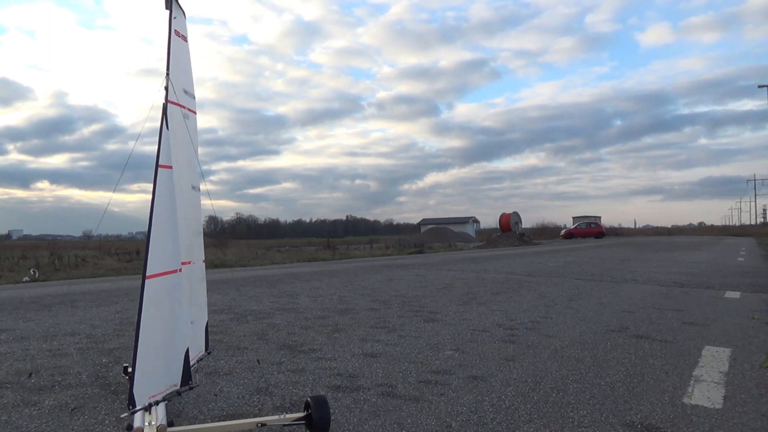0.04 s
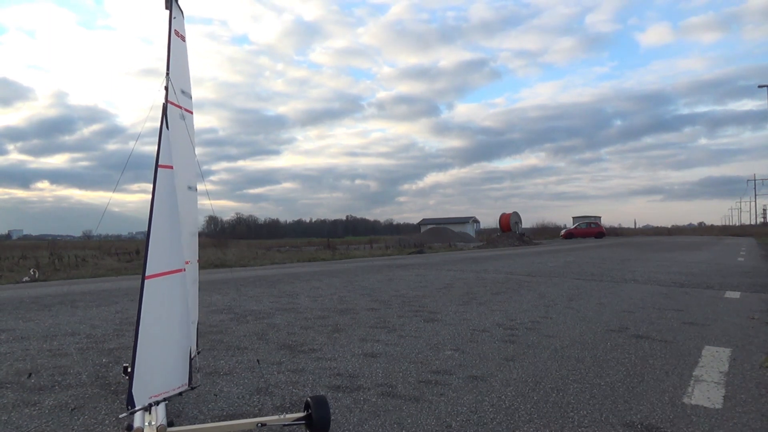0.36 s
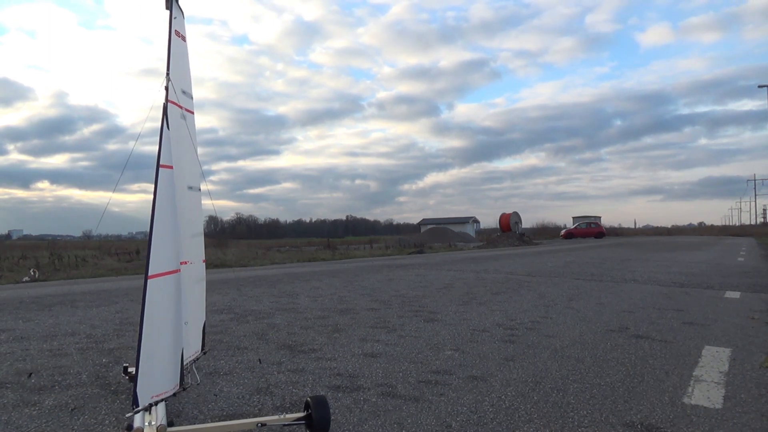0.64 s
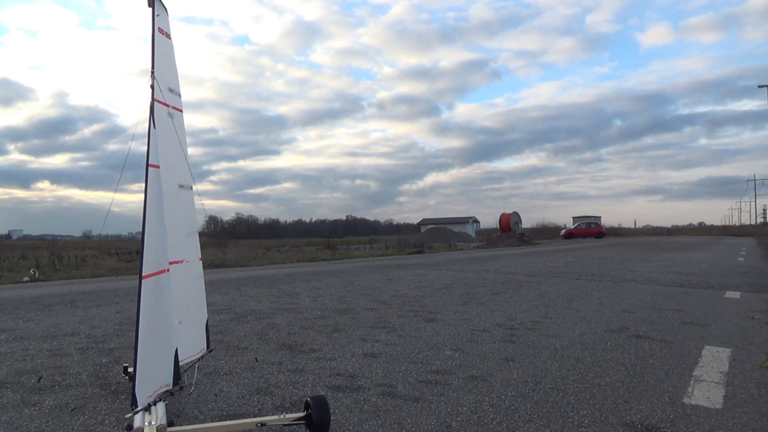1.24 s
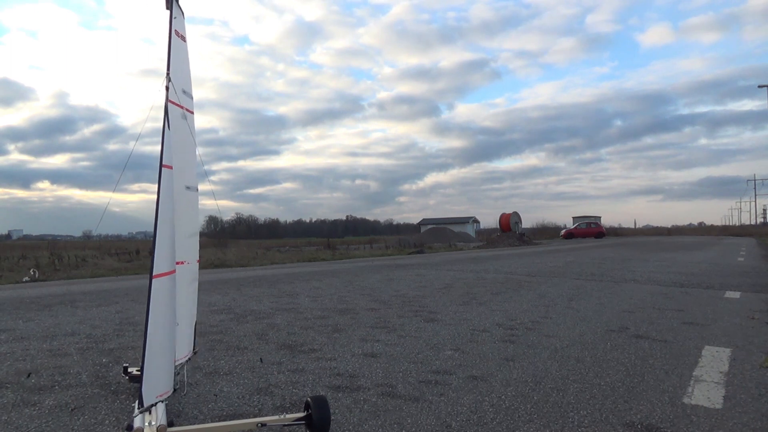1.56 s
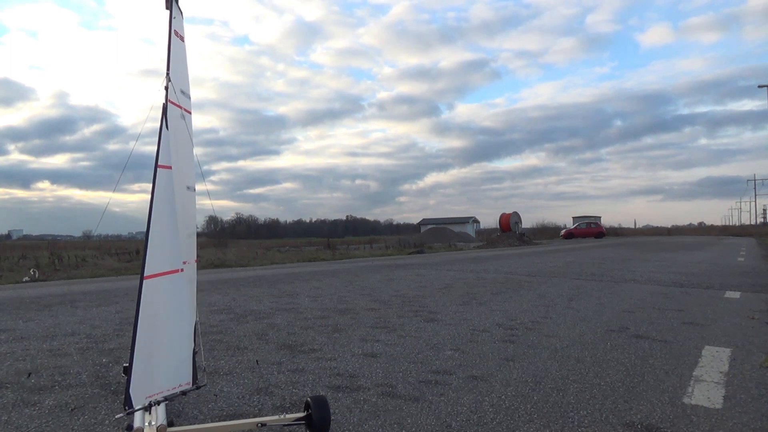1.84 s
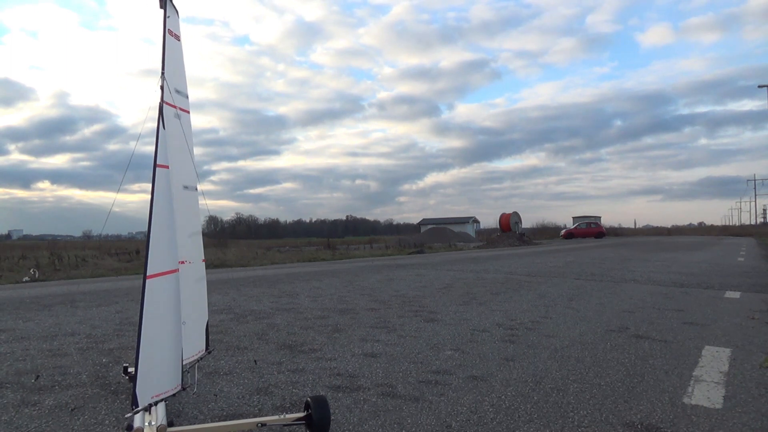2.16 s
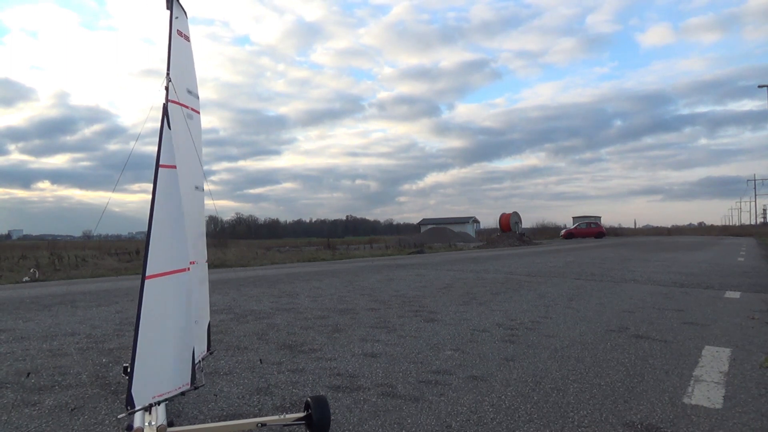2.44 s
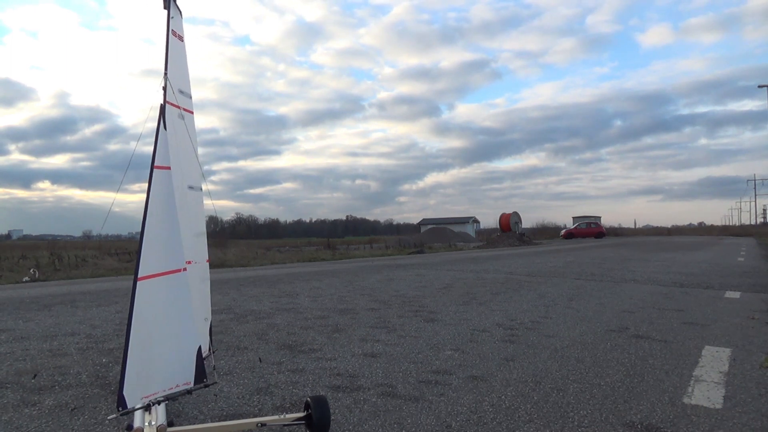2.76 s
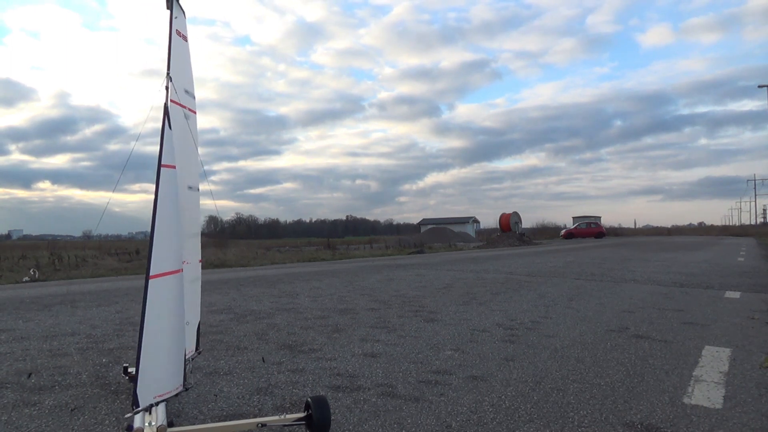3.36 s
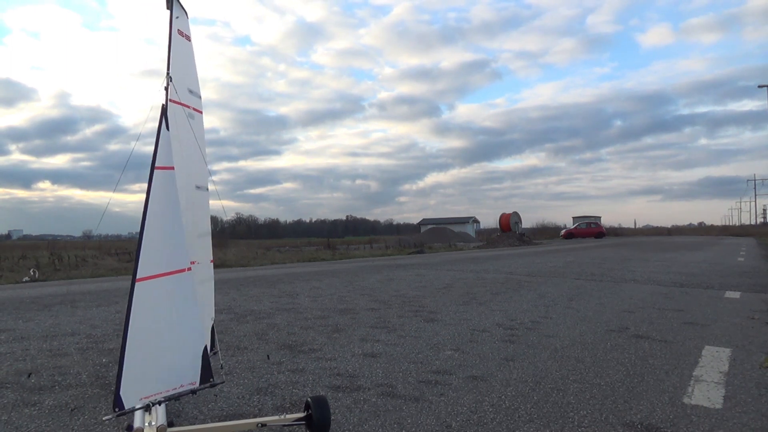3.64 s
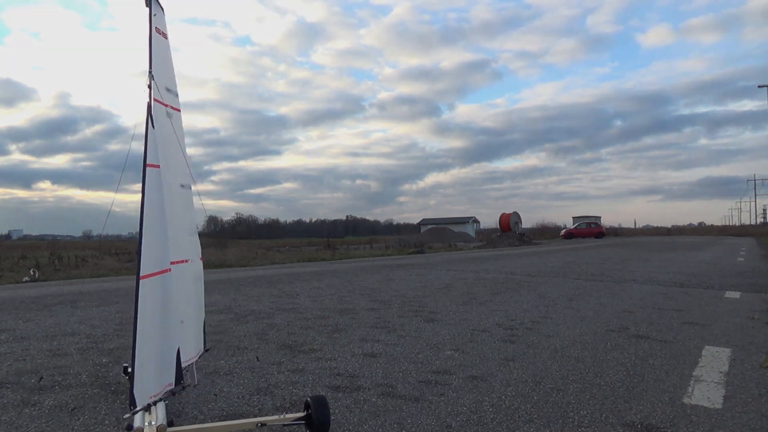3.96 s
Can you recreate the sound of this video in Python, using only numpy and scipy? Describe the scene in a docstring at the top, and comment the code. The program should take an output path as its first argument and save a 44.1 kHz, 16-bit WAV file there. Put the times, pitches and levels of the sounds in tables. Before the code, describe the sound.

A sail rustles, snaps and flaps in rumbling wind, with distant traffic fading.

```python
"""Land yacht in the wind

A small land yacht stands on open tarmac, its sail swinging from side to side. With each swing
many tiny wrinkles tick and merge into a rustle; creases snap, the belly flaps and a rigging
fitting clacks once. Wind rumbles on the microphone, and a howling roar, probably tyres on a
far road, slowly recedes."""
import sys
import numpy as np
from scipy import signal
from scipy.fft import rfft, irfft
from scipy.io import wavfile
from scipy.ndimage import uniform_filter1d

SR = 44100
rng = np.random.default_rng(int(sys.argv[2]) if len(sys.argv) > 2 else 0)


def wav_out(sig):
    """Save sig, one row per channel (or a flat mono array), as 16-bit PCM at SR to the path in sys.argv[1]."""
    wavfile.write(sys.argv[1], SR, np.round(np.clip(np.atleast_2d(sig).T, -1, 1) * 32767).astype(np.int16))


N = 176400
TIME = np.arange(N) / SR

# Course of the distant roar: t/s, level/dB, left minus right/dB
ROAR_COURSE = [(0, -24.5, 3), (.24, -22.5, 2), (.58, -24, 3.5), (.72, -23.5, 1.5), (1.18, -22.5, 0),
               (1.35, -25, -2), (1.62, -25.5, -4), (1.85, -28.5, -2.5), (2.5, -28.5, -1), (3.05, -28, -1.5),
               (3.5, -29.5, 2.5), (4, -30, 4)]
# Rustle of the cloth, swelling with each swing: t/s, level/dB
RUSTLE_LEVEL = [(0, -42), (.09, -46), (.2, -45), (.32, -40.5), (.62, -45), (.74, -39.5), (.89, -68),
                (1.02, -37.5), (1.17, -50), (1.26, -40), (1.29, -32), (1.35, -30.5), (1.42, -39.5),
                (1.52, -45), (1.61, -33), (1.7, -41.5), (1.79, -63), (1.91, -49), (1.975, -30.5),
                (2.04, -29), (2.13, -33), (2.22, -37.5), (2.31, -36.5), (2.43, -54), (2.54, -51),
                (2.64, -34.5), (2.75, -42.5), (2.8, -32), (2.85, -40.5), (2.91, -38.5), (2.96, -50.5),
                (3.14, -50.5), (3.22, -33), (3.31, -43), (3.38, -38.5), (3.45, -64), (3.6, -40.5),
                (3.66, -51.5), (3.92, -39.5), (4, -47)]


def amp(db):
    """Amplitude ratio for a level in decibels."""
    return 10 ** (np.asarray(db) / 20)


def unit(x):
    """Normalisation to an rms of 1."""
    return x / np.sqrt(np.mean(x ** 2) + 1e-20)


def colour(points, hz):
    """Interpolation of a spectrum on a logarithmic frequency axis."""
    f, value = np.transpose(points)
    return np.interp(np.log(hz + 1), np.log(f), value)


def curve(rows, t):
    """Linear interpolation of each column of a table at times t."""
    times, *columns = np.transpose(rows)
    return [np.interp(t, times, column) for column in columns]


def pan(db):
    """Level-difference stereo: two gains for a level of left minus right."""
    gains = amp(np.array([np.atleast_1d(db), -np.atleast_1d(db)]) / 2)
    return gains / gains.mean(0)


def add(mix, onset, sound):
    """Superposition of a stereo sound on the mix, from an onset in seconds."""
    part = mix[:, round(onset * SR):][:, :sound.shape[1]]
    part += sound[:, :part.shape[1]]


def shaped(pair, spectrum, coherence):
    """Partial coherence: two independent signals are filtered and mixed as mid and side."""
    hz = np.fft.rfftfreq(N, 1 / SR)
    a, b = rfft(pair)
    alike = np.clip(colour(coherence, hz), 0, 1)
    mid, side = a * np.sqrt(1 + alike), b * np.sqrt(1 - alike)
    return unit(irfft(np.array([mid + side, mid - side]) * amp(colour(spectrum, hz)), N))


def noise(spectrum):
    """Coloured open-air noise, less coherent between the channels in the treble."""
    # Likeness of left and right: f/Hz, coherence (0-1)
    air_coherence = [(40, 0.9), (300, 0.98), (1000, 0.95), (2500, 0.99), (5000, 0.7), (11000, 0.74)]
    return shaped(rng.standard_normal((2, N)), spectrum, air_coherence)


def waver(rate_hz, depth_db):
    """Random amplitude modulation: a log-normal gain fluctuating at around the given rate."""
    hz = np.fft.rfftfreq(N, 1 / SR)
    band = (hz / rate_hz) * np.exp(-(hz / rate_hz) ** 2)
    drift = unit(irfft(rfft(rng.standard_normal(N)) * band, N))
    return unit(amp(depth_db * drift))


def roar():
    """Attenuation with distance: the receding roar grows fainter and lower, wavering in the wind."""
    # Spectra of the roar when near and when far: f/Hz, relative density/dB
    near_spectrum = [(100, -18), (350, -22.5), (600, -8.5), (800, -2), (950, 0.5), (1250, -1.5),
                     (1700, -6.5), (2300, -19), (3300, -29.5), (5000, -40.5), (11000, -46)]
    far_spectrum = [(100, -14.5), (350, -10.5), (600, -3), (780, 0), (920, 2), (1250, -3.5), (1700, -14),
                    (2300, -19.5), (3300, -24.5), (5000, -35), (11000, -41.5)]
    db, side_db = curve(ROAR_COURSE, TIME)
    nearness = np.clip((db - db.min()) / np.ptp(db), 0, 1) ** 0.95
    sound = np.sqrt(nearness) * noise(near_spectrum) + np.sqrt(1 - nearness) * noise(far_spectrum)
    return sound * amp(db) * pan(side_db) * waver(rate_hz=20, depth_db=1.06)


def howl():
    """Narrow-band noise has a pitch: a howl stands out of the near roar, higher when stronger."""
    # Strength of the howl: t/s, level/dB
    howl_level = [(0, -36), (.28, -26), (.42, -28.5), (.57, -22.5), (.7, -34.5), (.95, -33.5),
                  (1.16, -26.5), (1.35, -36), (4, -45.5)]
    top_hz, hz_per_db, width_hz = 949, 3.5, 157
    db = curve(howl_level, TIME)[0]
    hz = top_hz + hz_per_db * (db - db.max())
    lowpass = signal.butter(2, width_hz / 2, fs=SR, output="sos")
    baseband = signal.sosfilt(lowpass, rng.standard_normal(N) + 1j * rng.standard_normal(N))
    carrier = np.exp(2j * np.pi * np.cumsum(hz) / SR)
    return unit((baseband * carrier).real) * amp(db) * pan(curve(ROAR_COURSE, TIME)[1])


def wind():
    """Turbulent pressure at the microphone: an uneven rumble with a few stronger eddies."""
    # Strength of the rumble: t/s, level/dB
    wind_level = [(0, -33.5), (1, -32.5), (1.8, -34.5), (2.75, -33.5), (3.05, -32.5), (3.45, -31),
                  (3.85, -33), (4, -36)]
    # Spectrum of the rumble: f/Hz, relative density/dB
    wind_spectrum = [(20, -34), (45, -11.5), (65, -1), (90, -1), (130, 0.5), (200, -3.5), (300, -15.5),
                     (600, -25.5), (2000, -38)]
    # Eddies, each at its peak: t/s, level/dB, f/Hz, half length/s
    eddies = [(2.968, -15.5, 106.3, 0.014), (3.285, -20.5, 104, 0.0169), (3.419, -25.5, 82.3, 0.03)]
    sag_per_s = 8.4
    out = noise(wind_spectrum) * amp(curve(wind_level, TIME)[0]) * waver(rate_hz=21.7, depth_db=1.83)
    for peak_time, db, hz, half_length in eddies:
        t = np.arange(-3 * half_length, 3 * half_length, 1 / SR)
        cycles = np.cumsum(hz * np.exp(-sag_per_s * t)) / SR
        buffet = np.exp(-(t / half_length) ** 2) * np.sin(2 * np.pi * cycles)
        add(out, peak_time + t[0], amp(db) * buffet * pan(db=3.5))
    return out


def rigging():
    """Impact excitation: a fitting jerked tight ticks on contact, then rings in damped modes."""
    # The clack and its rebound: t/s, level/dB
    impacts = [(3.6939, -3.5), (3.6953, -9)]
    # Modes of the fitting: f/Hz, relative level/dB, T60/s
    modes = [(2190, 0, 0.008), (2390, -1.5, 0.014), (3260, -7.5, 0.026), (3840, -6.5, 0.012)]
    tick_db, tick_decay_s, rise_s = -19, .0007, .0008
    out, t = np.zeros((2, N)), np.arange(SR // 20) / SR
    ring = sum(amp(db - 60 * t / t60) * np.sin(2 * np.pi * hz * t) for hz, db, t60 in modes)
    ring *= 1 - np.exp(-(t / rise_s) ** 2)
    for onset, db in impacts:
        tick = amp(tick_db) * rng.standard_normal(len(t)) * np.exp(-t / tick_decay_s)
        add(out, onset, amp(db) * (tick + ring) * pan(db=0.74))
    return out


def flaps():
    """Heavily damped oscillation: the sail fills with a short thump that sags in pitch."""
    # Thumps of the sail's belly: t/s, envelope peak/dB, starting f/Hz, decay time/s
    thumps = [(1.361, -22, 332, 0.0068), (1.376, -16.5, 307, 0.0026), (1.972, -13.5, 630, 0.0012),
              (2.0385, -12, 660, 0.0028), (2.6255, -4, 500, 0.00079), (3.09, -18.5, 337, 0.0038),
              (3.588, -23, 310, 0.0074)]
    rise_s, sag_fraction = .0011, 0.15
    out, t = np.zeros((2, N)), np.arange(SR // 10) / SR
    for onset, db, hz, decay_s in thumps:
        decay = np.exp(-t / decay_s)
        envelope = (1 - np.exp(-(t / rise_s) ** 2)) * decay
        cycles = np.cumsum(hz * (1 - sag_fraction * (1 - decay))) / SR
        thump = -envelope / envelope.max() * np.sin(2 * np.pi * cycles)
        add(out, onset, amp(db) * thump * pan(db=-2.5))
    return out


def snaps(size=1024):
    """Snap-through buckling: a crease pops over in one sharp pulse, and the cloth shivers briefly."""
    # Snapping creases: t/s, level/dB (energy spread over 1 ms), centre f/Hz, width/octaves
    creases = [(.172, -21.5, 2860, 0.35), (0.244, -22, 2130, 0.3), (0.3683, -25.5, 3260, 0.83),
               (0.982, -24, 2500, 0.68), (1.065, -22, 3650, 0.64), (1.2725, -18, 9500, 2.9),
               (1.2924, -27, 9500, 1.3), (1.34, -22, 2780, 2.6), (1.3781, -16.5, 1010, 1.3),
               (1.563, -30, 5000, 1), (1.6073, -21.5, 1800, 1.4), (1.631, -36, 2600, 1.3),
               (1.6627, -29.5, 2180, 1.1), (1.6977, -18.5, 1580, 1.06), (1.7513, -27.5, 1700, 1.8),
               (2.0304, -18, 1190, 0.72), (2.0369, -15.5, 2400, 1.43), (2.0473, -19.5, 1880, 2.4),
               (2.0933, -17.5, 2600, 3.9), (2.103, -19, 2500, 0.22), (2.123, -22, 5000, 6.2),
               (2.239, -19, 2000, 0.73), (2.2974, -26, 4700, 0.9), (2.306, -22.5, 2020, 0.87),
               (2.6121, -14.5, 780, 0.22), (2.6224, -17, 1090, 1.9), (2.685, -13.5, 1260, 0.64),
               (2.6898, -13.5, 1250, 0.72), (2.73, -26.5, 3620, 0.55), (2.799, -19.5, 890, 1.5),
               (2.8081, -23, 3320, 0.66), (2.8158, -21.5, 2660, 0.27), (2.925, -20.5, 5500, 1.4),
               (3.014, -25, 2600, 1.14), (3.159, -24, 1800, 0.56), (3.2033, -24.5, 2800, 0.26),
               (3.8178, -29.5, 5500, 2.5), (3.8305, -31, 4500, 1.4), (3.919, -26, 3500, 0.56)]
    shiver_gain, shiver_decay_s = 1.23, .0024
    out, t = np.zeros((2, N)), np.arange(size) / SR
    hz = abs(np.fft.fftfreq(size, 1 / SR)) + 1
    for onset, db, centre_hz, octaves in creases:
        log_gain = -5.1 * np.log(1 + (np.log2(hz / centre_hz) / octaves) ** 2 / 4)
        pulse = np.fft.ifft(np.exp(np.conj(signal.hilbert(log_gain)))).real  # minimum phase
        mid, side = rng.standard_normal((2, size)) * np.exp(-t / shiver_decay_s)
        shiver = np.array([mid + side / 2, mid - side / 2])
        tail = signal.fftconvolve(shiver / np.linalg.norm(shiver[0]), pulse[None])[:, :size]
        pop = unit(pulse + shiver_gain * tail) * np.sqrt(.001 * SR / size)
        add(out, onset, amp(db) * pop)
    return out


def crinkles(bands=24):
    """A Poisson process: wrinkles tick in broad resonances, sparse in lulls, crowded in a swing."""
    peak_ticks_per_s, crowding, spread_db = 4700, 1.15, 2.5
    out, db = np.zeros((2, N)), curve(RUSTLE_LEVEL, TIME)[0]
    activity = amp(db - db.max()) ** crowding
    for hz in np.geomspace(700, 10500, bands):
        strength = amp(spread_db * np.minimum(rng.exponential(1, N), 3))
        strength /= np.sqrt(activity)  # mean power stays the same at any tick rate
        angle = 2 * np.pi * rng.random(N)  # shares each tick between mid and side
        fires = rng.random(N) < activity * peak_ticks_per_s / bands / SR
        ticks = strength * fires * np.array([np.cos(angle), np.sin(angle)])
        resonance = signal.iirpeak(hz, Q=1.02, fs=SR)
        out += signal.lfilter(*resonance, signal.lfilter(*resonance, ticks))
    return unit(out)


def rustle():
    """Modulated noise: crinkles and swish follow the swing, flickering in colour as the cloth ripples."""
    # Spectrum of the cloth before the tilt: f/Hz, relative density/dB
    cloth_spectrum = [(100, -15), (300, 18.5), (700, 7.5), (1500, 9), (2800, 5), (4500, 1), (7500, -5),
                      (10700, -4)]
    # Likeness of left and right: f/Hz, coherence (0-1)
    cloth_coherence = [(300, 0.33), (2500, 1), (5500, 0.57), (11000, 0.56)]
    # Brightness of the rustle: t/s, tilt above 1500 Hz/(dB per octave)
    brightness = [(0, 7), (.3, -3), (1.05, 0), (1.31, 5), (1.62, -1.5), (1.97, 1.5), (2.7, 1.5), (3.3, 1.5),
                  (3.92, -2.5)]
    crinkle_db, swish_db, flicker_db = -1.2, -6.5, 3
    drive = amp(crinkle_db) * crinkles() + amp(swish_db) * rng.standard_normal((2, N))
    cloth = shaped(drive, cloth_spectrum, cloth_coherence) * waver(rate_hz=44, depth_db=1.5)
    hz, t, spectra = signal.stft(cloth, SR, nperseg=256)
    patches = uniform_filter1d(rng.standard_normal((len(t), len(hz))), size=7, axis=0)  # along time
    patches = uniform_filter1d(patches, size=5, axis=1)  # along frequency
    flicker = unit(amp(flicker_db * unit(patches))).T
    octaves = np.log2(np.maximum(hz, 1500) / 4000)
    tilt = amp(curve(brightness, t)[0] * octaves[:, None])
    rippling = signal.istft(spectra * flicker * tilt, SR, nperseg=256)[1][:, :N]
    return rippling * amp(curve(RUSTLE_LEVEL, TIME)[0]) * pan(db=-1.5)


def scene():
    """Free-field superposition: the sources add in the open air, with no echo."""
    return roar() + howl() + wind() + rustle() + snaps() + flaps() + rigging()


def record(dry):
    """Frequency response: two slightly unequal microphones, then a steep band limit."""
    # Sensitivity of the microphones: f/Hz, left minus right/dB
    mic_balance = [(85, 2), (180, -5), (400, -0.5), (1100, 0), (2000, -3.5), (5000, -2), (8500, 2)]
    gains = pan(colour(mic_balance, np.fft.rfftfreq(N, 1 / SR)))
    heard = irfft(rfft(dry) * gains, N)
    lowpass = signal.firwin(301, cutoff=11200, window=("kaiser", 9), fs=SR)
    return signal.oaconvolve(heard, lowpass[None], "same")


dry = scene()
out = record(dry)
wav_out(out)
```